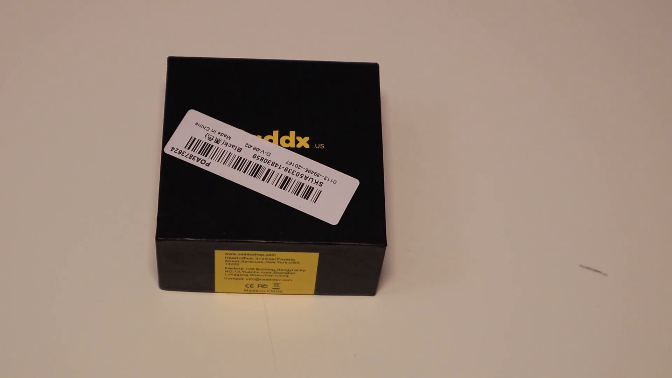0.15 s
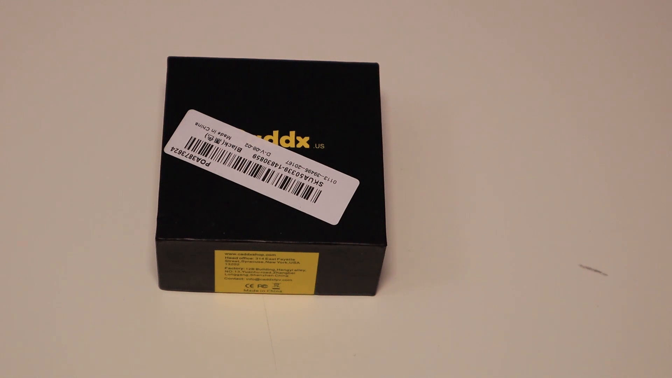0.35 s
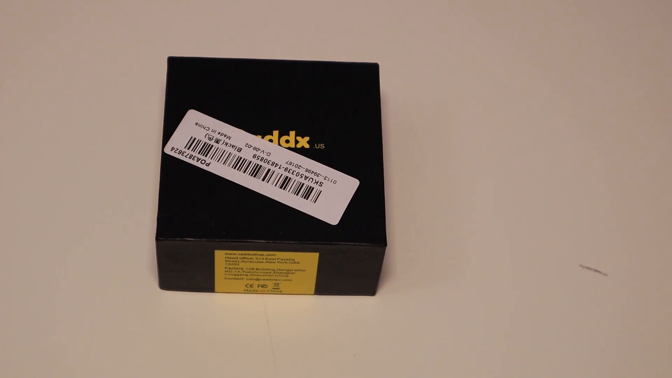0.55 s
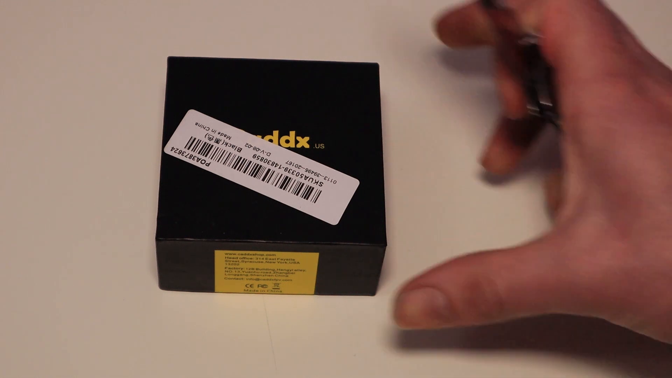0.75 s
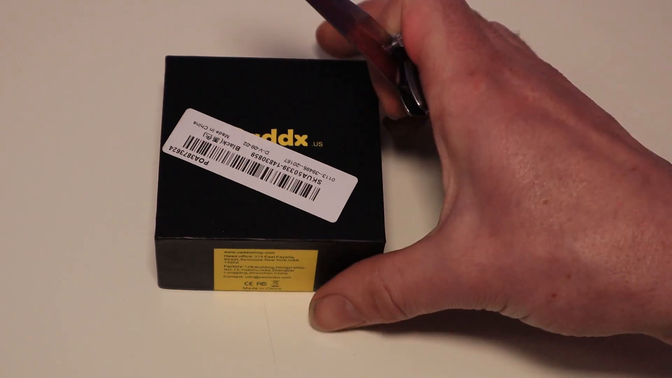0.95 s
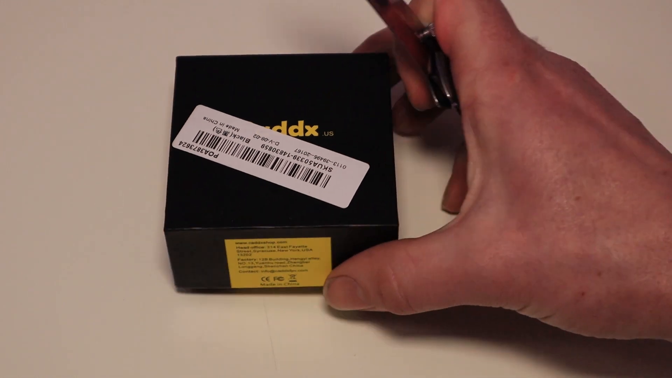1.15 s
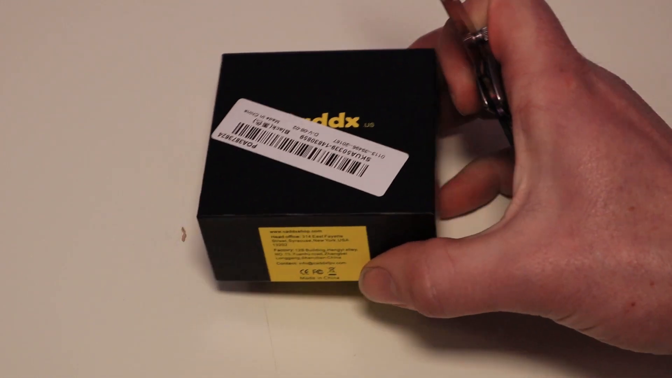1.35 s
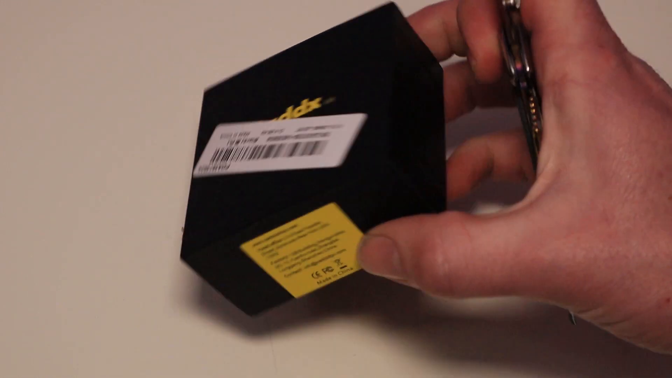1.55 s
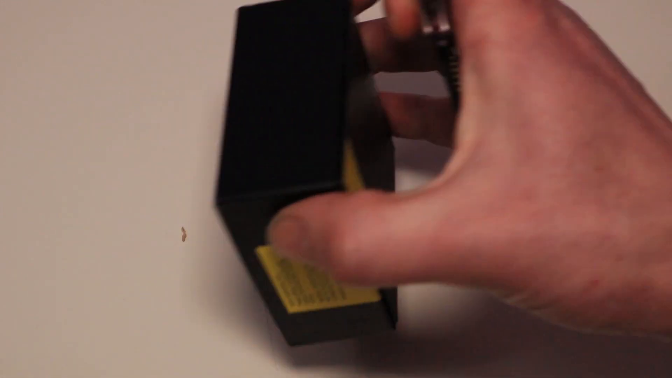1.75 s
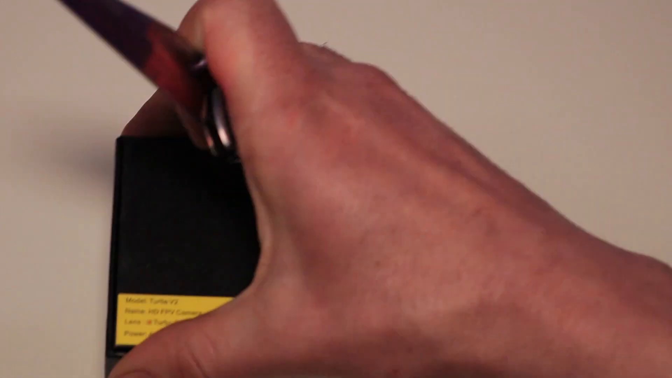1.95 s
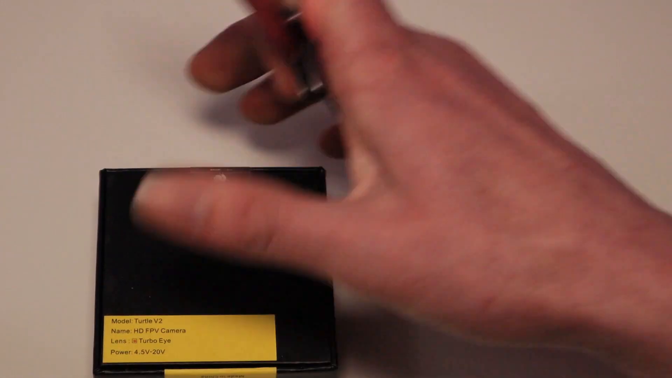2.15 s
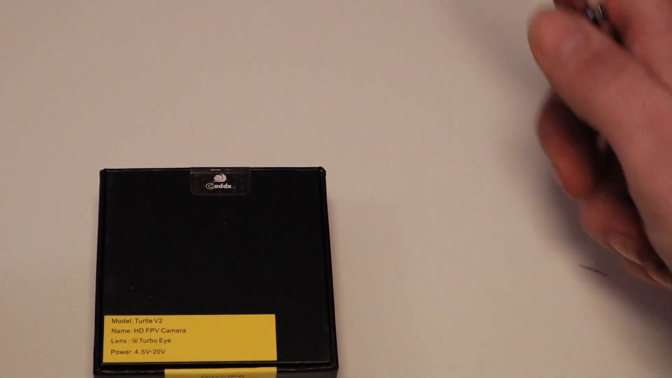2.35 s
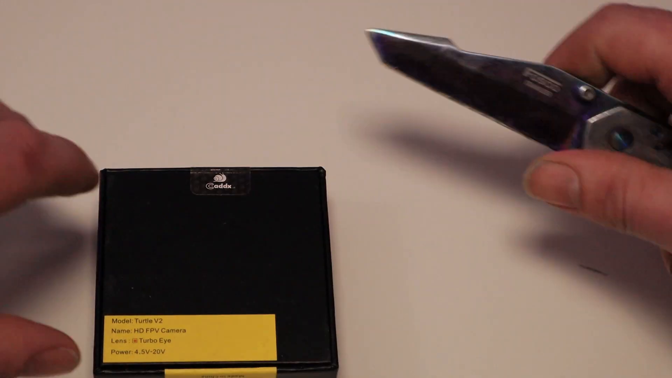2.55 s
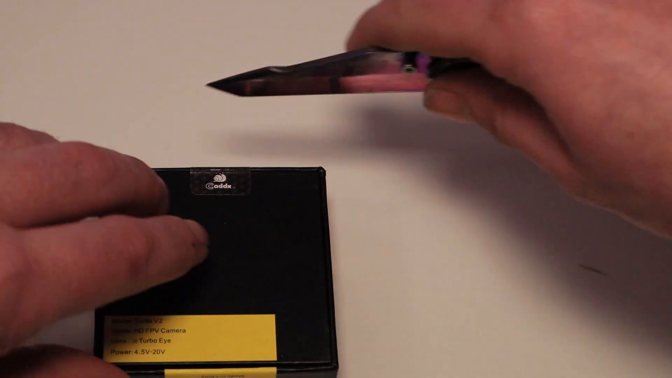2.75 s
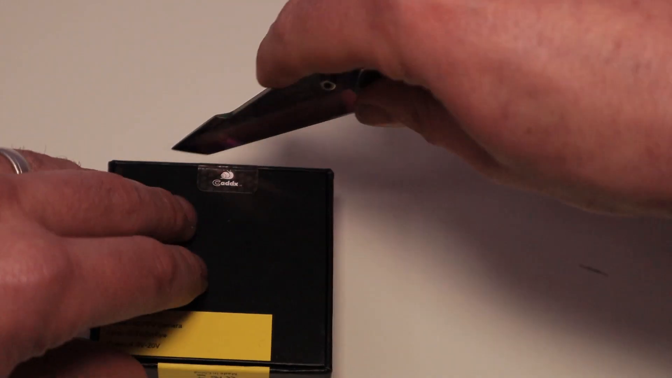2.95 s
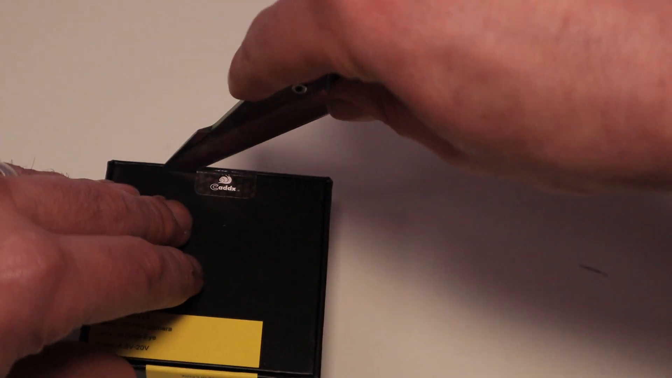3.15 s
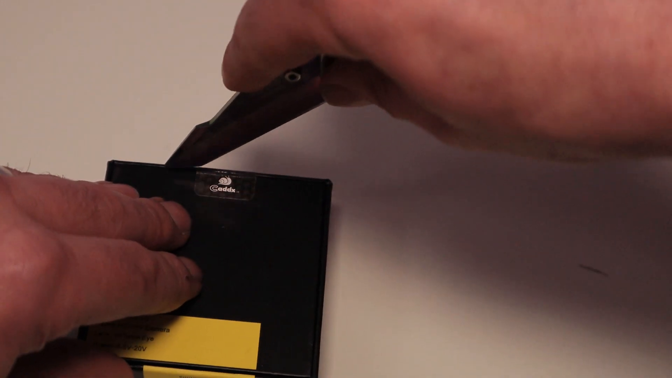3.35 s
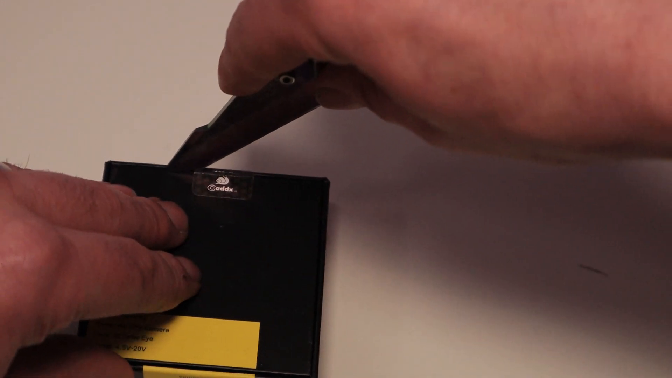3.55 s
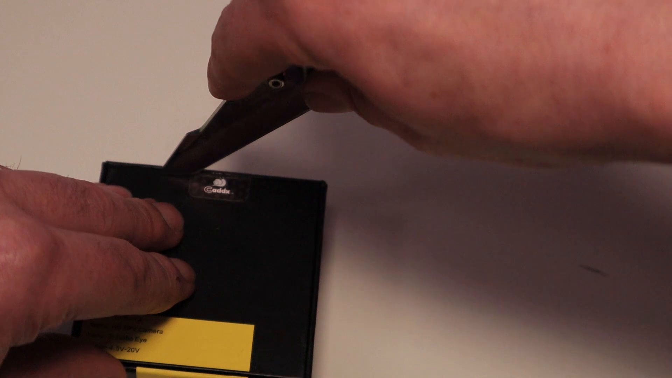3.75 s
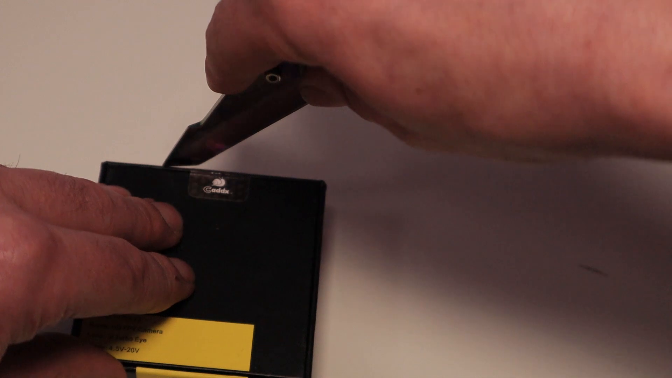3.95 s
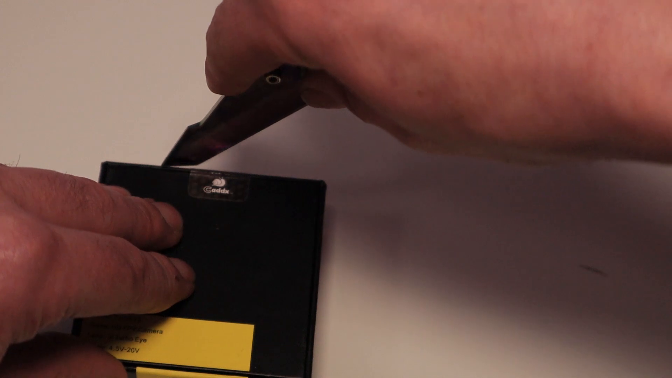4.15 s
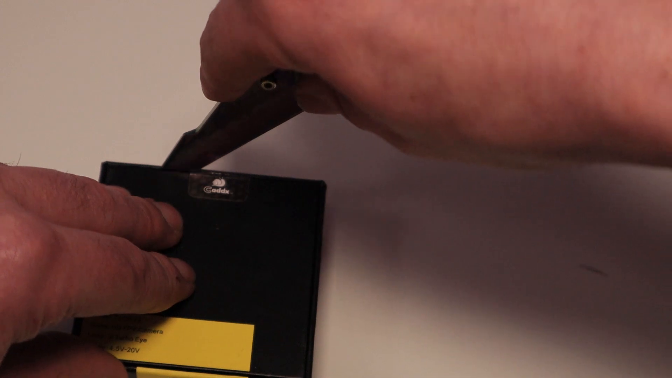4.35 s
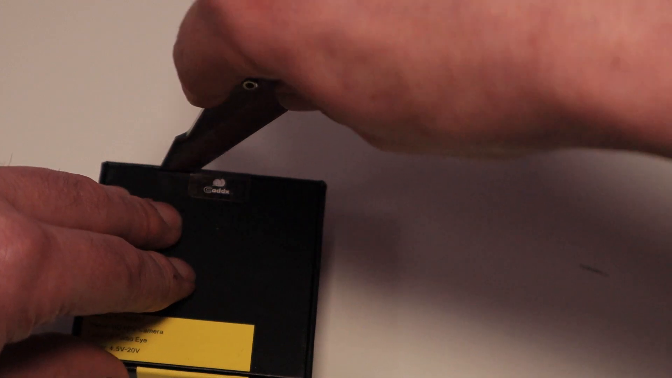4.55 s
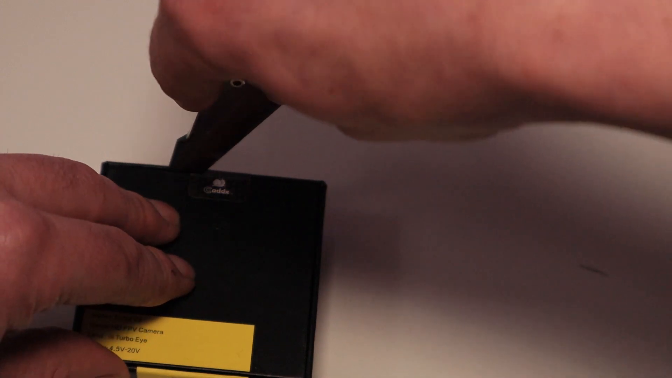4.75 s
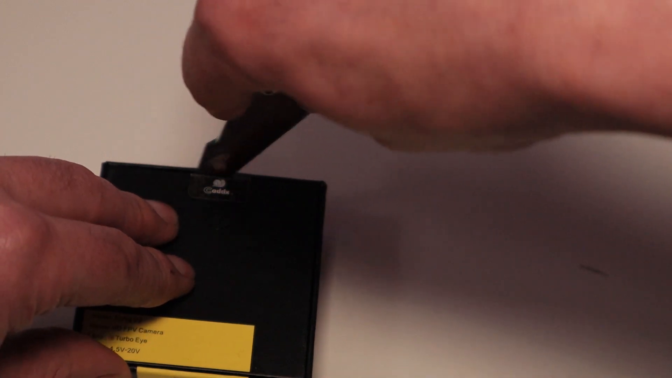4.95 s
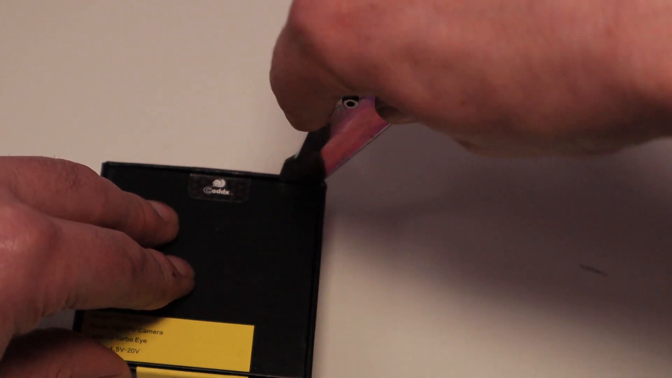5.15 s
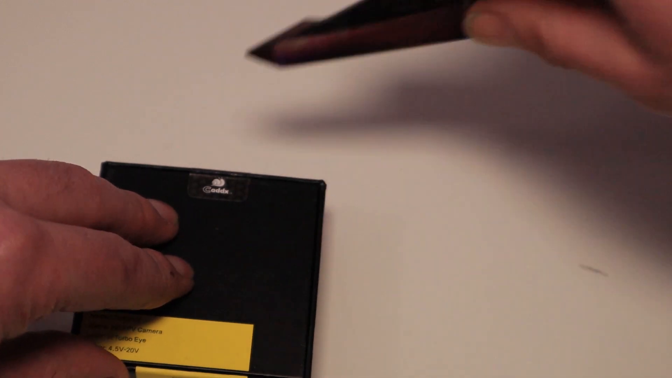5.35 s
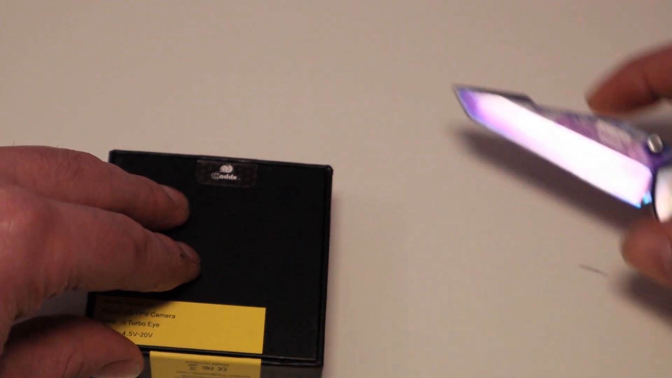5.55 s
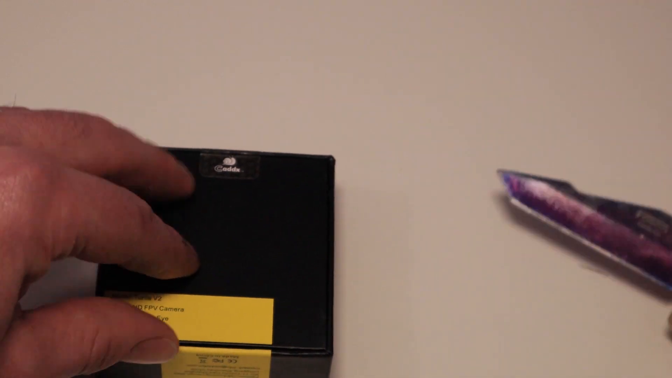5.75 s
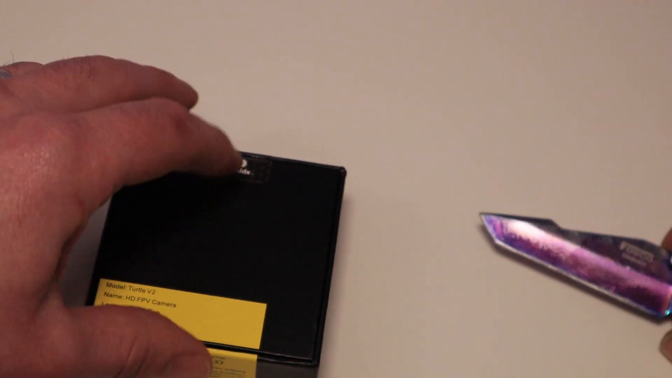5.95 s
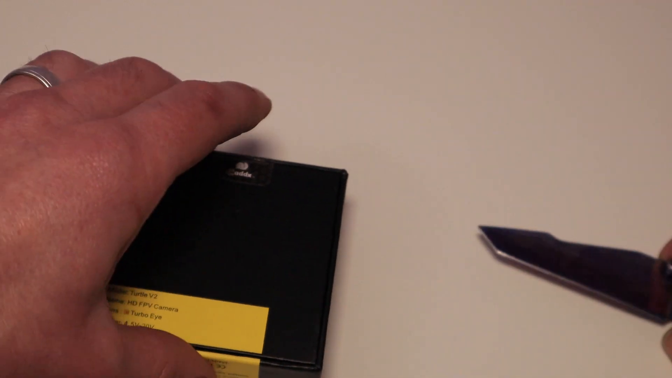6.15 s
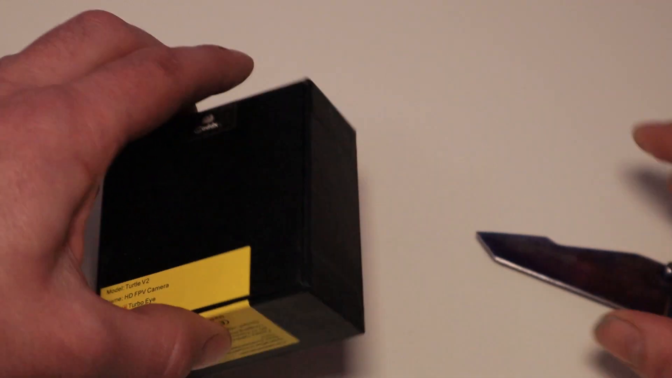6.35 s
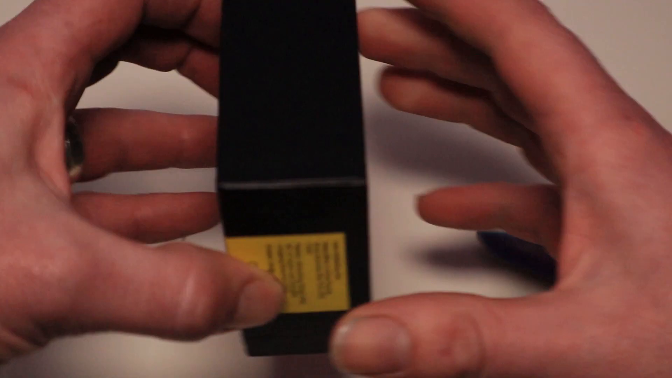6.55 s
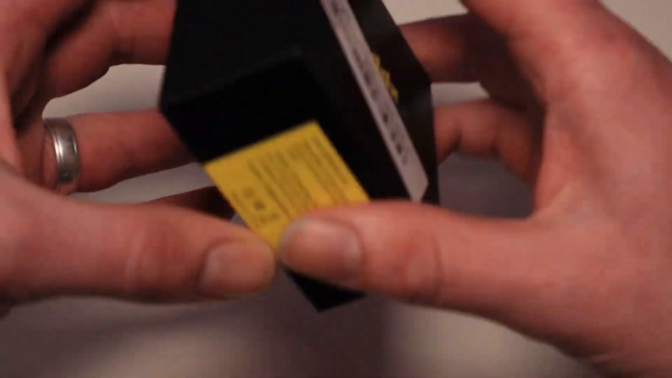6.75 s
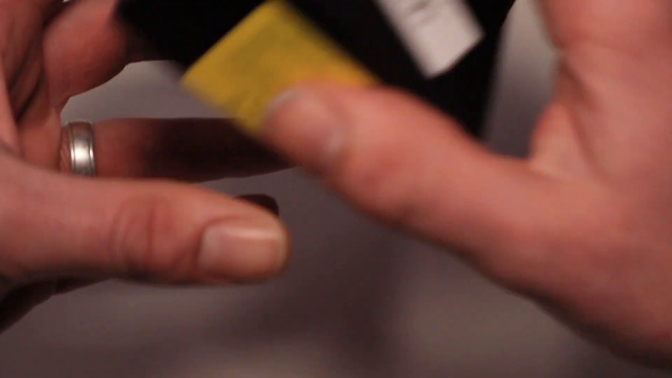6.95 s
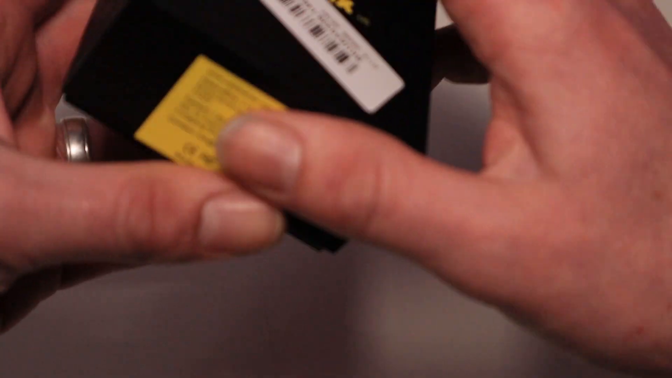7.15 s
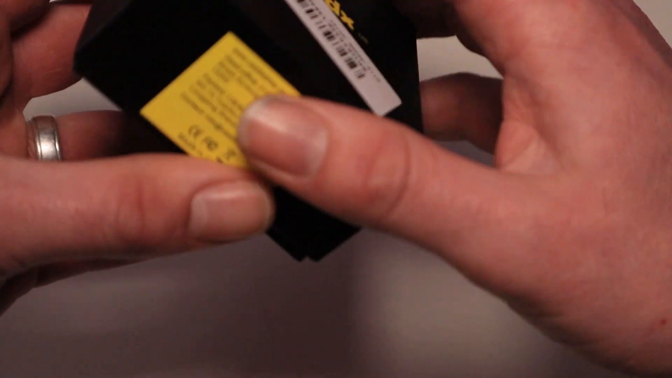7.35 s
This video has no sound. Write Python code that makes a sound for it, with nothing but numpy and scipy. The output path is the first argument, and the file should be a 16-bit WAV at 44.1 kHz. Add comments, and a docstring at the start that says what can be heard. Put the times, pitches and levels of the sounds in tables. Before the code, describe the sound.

In a quiet small room, close to a stereo microphone, a folding knife snaps open with a bright steel clack. A small rigid box is gripped with a hollow knock, scuffed, turned and dropped in a tight cluster of loud clacks. Faint blade ticks and dry scrapes follow, sharper as the seal gives. The box is then tipped with loud clattering knocks and a short skid on the table, ending in brief card rubs.

```python
"""Knife and cardboard box

A folding knife snaps open; a small box is gripped, flipped, dropped on a table, slit, tipped and lifted.
Struck card, table and steel are banks of dying modes plus noise bursts; rubbing and skids are clumped slips.
Gusts, deep bumps, a sliding fuzzy tone, a low hum and still air lie around them as shaped noise and sines.
A small room answers; two close microphone ports pick it all up and a peak limiter tames the loudest knocks."""
import sys
import numpy as np
from scipy import signal
from scipy.fft import rfft, irfft, next_fast_len
from scipy.io import wavfile
from scipy.ndimage import uniform_filter1d, minimum_filter1d

SR = 44100
rng = np.random.default_rng(int(sys.argv[2]) if len(sys.argv) > 2 else 0)


def output_pcm(signal):
    """Save a mono or channel-first signal as 16-bit PCM at the path in sys.argv[1].

    Samples are clipped to [-1, 1] before scaling.
    """
    pcm = np.clip(np.atleast_2d(signal).T, -1, 1) * 32767
    wavfile.write(sys.argv[1], SR, np.round(pcm).astype(np.int16))


N = 326781
RING_T = np.arange(SR // 5) / SR  # time axis of one hit [s]

# Blows on the box: fingertips land, it is gripped, tilted, turned, dropped; the blade pokes and the seal
# gives; it is tipped up, knocks along its edge and is lifted. Thump to table ring are relative to the level.
# (time [s], level before contact softening [dB], thump [dB], thump pitch [Hz], crack [dB], snap [dB],
#  table ring [dB], bearing [+ left])
KNOCKS = [(0.684, -59.5, 8.5, 243, -37, -28.5, -12, 0.68), (0.988, -62.5, 7.5, 259, -18, 1, -22, -0.87),
          (1.025, -20, -7.5, 241, -3, -19.5, -7.5, -0.67), (1.029, -20.5, -47, 270, -9, -42, -11.5, .9),
          (1.067, -35, -18, 290, -18, -45, -31, 0.28), (1.411, -39, -1, 265, -19, -23, -3, .85),
          (1.478, -39.5, -10, 300, -6, -27, -9.5, 0.8), (1.758, -45.5, -13, 250, -10, -29, -21.5, -0.59),
          (1.807, -41.5, 0.5, 330, -3, -42, -11, -1), (1.829, -49.5, 10, 306, -9.5, -32, -13, -0.87),
          (1.884, -50, -0.5, 283, -4, -27, -11, -1.1), (1.915, -50.5, 4.5, 302, -13, -30, -12.5, -0.7),
          (1.945, -49, 4.5, 200, -0.5, -12, -11.5, 0.6), (1.995, -51, 7, 208, -14, -22, -12, 0.7),
          (2.0456, -45, -25, 250, 3, -17, -15.5, -0.3), (2.1699, -18.5, -8, 264, -8, -27, -27.5, 0.43),
          (2.1791, -20.5, -7, 420, -1.5, -15, -20.5, 0.31),
          (2.1827, -15.5, -11.5, 436, 0.5, -21.5, -27, 0.023), (2.189, -20, -5, 313, -10, -53, -24, .3),
          (2.229, -35.5, -3, 298.5, -4, -40, -21.5, -0.12), (3.624, -41.5, 8, 265, -9, -18, -37.5, 0.83),
          (3.758, -41.5, 1, 252, -17.5, -21, -19, 0.57), (4.059, -52.5, 6, 280, -30.5, -30.5, -24, 0.43),
          (4.413, -56.5, 14.5, 269, -17, -27, 4.5, 0.39), (5.129, -39, -3.5, 283.6, -6, -20, -3, .5),
          (5.78, -56, 3, 171, -8, -20, -7.5, 0.31), (6.2443, -18, -10, 204, 0, -17.5, -22.5, -0.69),
          (6.287, -32.5, -14, 210, -4, -44, -13, -0.37), (6.3711, -22, -6, 200, -9.5, -25.5, -15, -0.71),
          (6.381, -28.5, -16, 200, -1, -23, 8, -0.3), (6.394, -40.5, -17, 190, -4, -23, -3, -0.63),
          (6.405, -27, -2, 187, -1, -16, -14, -1.4), (6.456, -33.5, 1, 204, 0, -15, -16, -1.2),
          (6.492, -35.5, 2.5, 201, -0.5, -16, -15, -1), (6.531, -36, 0, 210, -5, -18, -14, -0.24),
          (6.554, -36, -3, 197, -2, -34, -6, -.5), (6.58, -42, -1, 227, -8, -29, -3, -0.46),
          (6.604, -42, -4.5, 228, -12, -25, 4, -0.62), (7.125, -42, 3.5, 257, 0.5, -5, -26, 0.21)]
# Strokes of blade and fingers over the card
# (start [s], swell [s], fade [s], peak box body [dB], peak grit [dB])
STROKES = [(0, 0.0015, 0.17, -63.5, -65), (1.079, 0.035, 0.093, -50, -67), (1.19, 0.029, 0.13, -54, -68),
           (1.269, 0.01, 0.26, -55, -81), (1.409, 0.037, 0.087, -46.5, -70),
           (1.737, 0.017, 0.45, -55.5, -69.5), (2.102, 0.078, .015, -61.5, -66),
           (2.499, 0.066, 0.077, -60.5, -68.5), (3.04, 0.0073, 0.22, -62.5, -73),
           (4.011, 0.0097, 0.073, -59.5, -78.5), (4.064, 0.023, 0.12, -58.5, -93),
           (4.24, 0.056, 0.033, -63, -91.5), (4.409, 0.015, 0.032, -53, -72),
           (4.573, 0.075, 0.17, -56, -71.5), (4.774, 0.038, 0.028, -58.5, -53.5),
           (4.907, 0.034, 0.094, -48.5, -58.5), (4.97, 0.16, 0.15, -46, -58.5),
           (5.123, 0.0085, 0.023, -46, -48.5), (5.35, 0.057, 0.016, -55.5, -56),
           (5.413, 0.01, 0.017, -44, -71), (5.557, 0.084, 0.14, -51.5, -67),
           (5.799, 0.015, 0.092, -54.5, -77.5), (6.039, 0.02, 0.052, -59.5, -62.5),
           (6.19, 0.054, 0.033, -62, -64.5), (6.741, 0.02, 0.082, -59.5, -69),
           (6.838, 0.0053, 0.13, -58.5, -72), (7.068, 0.022, 0.027, -43.5, -56.5),
           (7.111, 0.023, 0.028, -36.5, -50.5), (7.14, 0.0081, 0.025, -38.5, -63),
           (7.23, 0.056, 0.039, -76, -87), (7.369, 0.0107, 0.1, -67, -92)]
# The box judders along the table: deeper when pressed harder, duller when slower
# (start [s], length [s], level before band filter and sag [dB], lowest pitch [Hz], highest pitch [Hz])
SKIDS = [(1.189, 0.079, -39, 377, 1500), (1.265, 0.059, -54, 400, 1200), (1.428, 0.076, -45.5, 332, 2500),
         (6.398, 0.169, -30.5, 162, 2000), (6.563, 0.118, -38, 260, 870)]
# Ticks of blade tip and fingernails: (time [s], treble level [dB], box ring over the treble [dB])
TICKS = [(1.155, -74, 20), (1.216, -76, 11), (1.23, -76.5, 25.5), (1.285, -78, 26), (1.882, -72, 10),
         (2.155, -62.5, -2), (3.0533, -63.5, 12), (3.296, -80, 20), (4.0109, -66, -11.5),
         (4.583, -67.5, -1), (4.8013, -63, -7), (4.823, -67.5, 6), (4.928, -62, 3), (5.1086, -52, 5),
         (5.1285, -48.5, 2), (5.462, -49, -1), (5.859, -67.5, 11.5), (5.898, -61, 7), (5.9319, -73, 19.5),
         (5.953, -67.5, 9.5), (6.002, -75.5, 20), (6.129, -68.5, 14.5), (6.6557, -61.5, 11),
         (6.8558, -60, 4), (7.084, -58, 4)]
# The knife flicks open and locks
# (time [s], level [dB], steel noise t60 [s], handle ring over the level [dB], bearing [+ left])
LATCH = [(0.438, -55.5, 0.047, -8, -2.5), (0.443, -35.5, 0.012, -28.5, -1.5),
         (0.445, -41.5, 0.053, -21.5, -2.5), (0.454, -47, 0.036, -12, -0.5), (0.4648, -35.5, 0.062, -5, -2),
         (0.4683, -40, 0.0084, -4, -2)]
# Gusts as the arm sweeps past the microphone: (start [s], length [s], level before sag [dB])
BUFFETS = [(1.815, 0.29, -43.5), (2.359, 0.31, -39)]
# Deep bumps around the gusts: (start [s], length [s], pitch [Hz], peak [dB])
BUMPS = [(1.821, 0.022, 95, -30.5), (1.84, .055, 105, -31), (1.943, 0.06, 132, -46),
         (2.409, 0.039, 65.3, -44), (2.42, .05, 89.2, -37), (2.51, 0.082, 86.1, -33),
         (2.557, 0.063, 62.3, -39)]
# A fuzzy tone that comes twice: (start [s], length [s], starting pitch [Hz], level [dB])
TONES = [(0, 0.19, 306.7, -57.5), (0.461, 0.21, 370, -65.5)]
# Course of the low hum, which drops near its end: (time [s], pitch before waver [Hz], level [dB])
HUM = [(2.651, 133, -63.5), (3.1, 129, -75), (3.6, 130.4, -62), (4.9, 134.2, -65.5), (5.599, 133, -64),
       (6.1, 112.2, -61.5), (6.3, 113, -50)]

# Modes of the card walls: (pitch before detuning [Hz], relative level [dB], t60 before damping [s])
BOX_MODES = [(288.5, 0, 0.18), (350, -4, 0.07), (437, -1.5, 0.053), (617.7, 3.5, 0.062),
             (718.3, 9.5, 0.054), (789.4, 4, 0.097), (872, 2.5, 0.065), (980, -1.5, 0.038),
             (1160.5, -2.5, 0.096), (1450, -12, 0.037), (1770, -7.5, 0.044)]
# Modes of the table top: (pitch before detuning [Hz], relative level [dB], t60 before damping [s])
TABLE_MODES = [(194.5, -6, 0.2), (484, 6.5, 0.11), (568, -14, 0.06), (790, -16, 0.065), (880, -5.5, 0.089),
               (1090, -12, 0.16)]
# Modes of the knife handle: (pitch before detuning [Hz], relative level [dB], t60 [s])
HANDLE_MODES = [(1350, -9, .02), (1700, -9, .02), (2062, -6, .025), (2234, 1, .03), (2412, 0, .03),
                (3133, -12, .02), (4064, -10, .02), (5480, -11, .02)]
# Modes of the blade: (pitch [Hz], relative level [dB], t60 [s])
BLADE_MODES = [(6460, -14, 0.066), (7000, 1.5, 0.08), (7260, -8, 0.11), (8600, -12, .1),
               (10250, -14.5, .12), (10660, -7, 0.15), (10850, 5, 0.1), (11500, -2.5, 0.068),
               (12200, -4, 0.12)]

# Spectrum of rattling card: (frequency [Hz], relative level [dB per Hz])
CLATTER_SPECTRUM = [(60, -22.5), (130, -4.5), (300, 0.5), (520, 2), (820, 7), (1100, -0.5), (1800, -5.5),
                    (3000, -21.5), (5000, -31.5), (8000, -37.5), (11000, -43.5), (13000, -51.5),
                    (16000, -55.5)]
# Spectrum of clacking steel: (frequency [Hz], relative level [dB per Hz])
STEEL_SPECTRUM = [(600, -72), (1200, -21), (2300, -14.5), (3200, -15.5), (5000, -14), (7000, -8.5),
                  (8000, -11.5), (11000, 0), (12500, -7.5), (15000, -20), (16000, -17)]
# Spectrum of the box body under ticks and strokes: (frequency [Hz], relative level [dB per Hz])
BODY_SPECTRUM = [(80, -24.5), (200, -5), (310, -6), (450, -2.5), (590, -4), (730, 2.5), (900, -4),
                 (1100, -9), (1750, -13), (2700, -17), (6000, -38)]
# Spectrum of the direct scrape: (frequency [Hz], relative level [dB per Hz])
GRIT_SPECTRUM = [(800, 0.5), (1900, 8.5), (2800, 9.5), (3700, 4), (5000, 2), (8000, 0.5), (11000, 3),
                 (12500, 1.5), (14000, -16), (16000, -21.5)]
# Spectrum of the gusts: (frequency [Hz], relative level [dB per Hz])
BUFFET_SPECTRUM = [(12, -52), (20, -6), (76, -3.5), (114, 1), (144, -16), (198, -4.5), (440, -18.5),
                   (585, -18.5), (900, -28), (1170, -33), (1980, -120)]
# Spectrum of room air shared by both ports: (frequency [Hz], relative level [dB per Hz])
AIR_SPECTRUM = [(12, -33), (20, -3), (65, 6), (113, -2), (177, -10), (319, -8.5), (399, -11.5),
                (718, -15.5), (1060, -18.5), (3440, -26), (8650, -36), (11400, -34.5), (13200, -48),
                (16000, -68)]
# Spectrum of room air that differs between the ports: (frequency [Hz], relative level [dB per Hz])
AIR_SIDE_SPECTRUM = [(20, -45), (60, -27), (187, 1), (700, -0.5), (2700, -8), (11800, -22.5),
                     (13200, -22.5), (14300, -52.5), (16000, -50)]
# Room decay: (frequency [Hz], t60 [s])
ROOM_DECAY = [(200, 0.11), (300, 0.52), (870, 0.43), (2300, 0.46), (6000, 0.44), (12000, 0.31),
              (15000, 0.17)]
# Gain from the sideways row to the port difference: (frequency [Hz], gain [dB])
PORT_WIDTH = [(50, -38), (110, -37.5), (200, -22.5), (380, -10), (700, -8.5), (1290, -0.5), (2380, 1),
              (4400, 3), (8120, 3), (15000, 3.5)]

THUMP_CYCLES = 5.2  # the air in the box: cycles until a thump has fallen 60 dB
CONTACT_S = 0.00091  # contact time constant of a blow whose thump equals its level
CLATTER_T60_S, CLATTER_S_PER_DB = 0.028, 0.0559  # blows with more crack clatter for longer
CLATTER_DB = -1.5  # clatter over the ring of the walls
STROKE_CURVE = 1.1  # loudness follows stroke speed to this power
HOLLOW_HZ, HOLLOW_DB = 755, -1  # where the hollow box sings, and its level over the body
GRAIN_LOW_HZ, GRAIN_HIGH_HZ = 1000, 3803  # pitch range of snapping fibres
GRAINS_PER_S, GRAIN_DB = 460, -4  # snap rate, and level over the grit
SKID_ATTACK_S, SKID_RELEASE_S, SKID_SAG_DB_PER_S = 0.016, 0.062, 29
BUFFET_ATTACK_S, BUFFET_RELEASE_S, BUFFET_SAG_DB_PER_S = 0.03, 0.13, 11.5
BUFFET_LUMPS_DB = 1.3  # unevenness within a gust
TONE_SLIDE_HZ_PER_S, TONE_ATTACK_S, TONE_RELEASE_S = 120, 0.016, 0.094
HUM_FADE_S = 0.047
AIR_DB = -61  # shared room air
EDGE_HZ = 15900  # final band limit


def knocks():
    """Card walls ring and clatter; soft blows thump, hard edges crack, and the table top rings along."""
    out = np.zeros((2, N))
    click = unit_hit(colour(signal.unit_impulse(len(RING_T)), CLATTER_SPECTRUM))
    for s, db, thump_db, thump_hz, crack_db, snap_db, table_db, bearing in KNOCKS:
        # clean contact, then the card rattles
        rattle = burst(CLATTER_T60_S + CLATTER_S_PER_DB * crack_db, CLATTER_SPECTRUM)
        clatter = unit_hit(click + rattle)
        walls = ring(BOX_MODES, damping=0.95, detune=.05) + amp(CLATTER_DB) * clatter
        walls = band(band(walls, 380, "highpass", order=2), 1000, "lowpass")
        crack = band(clatter, [1100, 4600], "bandpass", order=2)
        snap = band(clatter, [4400, 12500], "bandpass")
        thump = band(ping(thump_hz, THUMP_CYCLES), [100, 600], "bandpass", order=3)
        hit = unit_hit(walls) + amp(crack_db) * unit_hit(crack)
        hit += amp(snap_db) * unit_hit(snap) + amp(thump_db) * unit_hit(thump)
        hit += amp(table_db) * ring(TABLE_MODES, detune=0.0059)
        # thumping blows have a longer, softer contact
        press = 1 - np.exp(-RING_T / (CONTACT_S * amp(thump_db)))
        add(out, s, amp(db) * press * hit, bearing)
    return band(out + 1e-12, 120, "highpass")  # too small a box to radiate deep bass


def rubbing():
    """Each stroke speeds up and slows down; the same slips hiss directly and drone in the hollow box."""
    body_gain, grit_gain = np.zeros((2, N))
    for s, swell_s, fade_s, body_db, grit_db in STROKES:
        first = max(round(s * SR), 0)
        at = np.arange(first, min(round((s + swell_s + fade_s) * SR), N))
        speed = np.interp(at / SR - s, [0, swell_s, swell_s + fade_s], [0, 1, 0])
        body_gain[at] += amp(body_db) * speed ** STROKE_CURVE
        grit_gain[at] += amp(grit_db) * speed ** STROKE_CURVE
    drive = slips(per_s=2000, spread_db=3.2, clump_db=1.8, smooth=.45)
    body = evened(evened(colour(drive, BODY_SPECTRUM)) + amp(HOLLOW_DB) * hollow(drive))
    grit = evened(evened(colour(drive, GRIT_SPECTRUM)) + amp(GRAIN_DB) * grains())
    return np.outer([1, 1.05], body * body_gain) + np.outer([1, 1.1], grit * grit_gain)


def slips(per_s, spread_db, clump_db, smooth):
    """Fibres catch and let go: clumped clicks of uneven size over a smooth hiss."""
    sizes = amp(spread_db * np.minimum(rng.exponential(1, N), 4))
    clicks = rng.standard_normal(N) * (rng.random(N) < per_s / SR) * sizes
    clumps = amp(clump_db * evened(band(rng.standard_normal(N), 79, "lowpass")))
    return evened(clumps * (evened(clicks) + smooth * rng.standard_normal(N)))


def hollow(drive):
    """A broad resonance whose pitch wanders as the hand presses on the box."""
    hz = HOLLOW_HZ * (1 + 0.05 * evened(band(rng.standard_normal(N), 12, "lowpass")))
    turn = np.exp(2j * np.pi * np.cumsum(hz) / SR)
    # shift the resonance down to 0 Hz, keep what is near it, shift it back
    return evened((turn * band(drive / turn, 175, "lowpass")).real)


def grains(count=14):
    """Single fibres snap, each on one of a set of pitches."""
    snaps = rng.standard_normal((count, N)) * (rng.random((count, N)) < GRAINS_PER_S / count / SR)
    pitches = np.geomspace(GRAIN_LOW_HZ, GRAIN_HIGH_HZ, count)
    return evened(sum(signal.oaconvolve(row, ping(hz, 5))[:N] for row, hz in zip(snaps, pitches)))


def skidding():
    """The bottom edge sticks and slips, shaking the table top and rattling the card."""
    grip = slips(per_s=470, spread_db=2.5, clump_db=3.0, smooth=0.22)
    drive = np.zeros(N)
    for s, length, db, low_hz, top_hz in SKIDS:
        gain = amp(db) * swell(s, length, SKID_ATTACK_S, SKID_RELEASE_S, SKID_SAG_DB_PER_S)
        drive += band(grip * gain + 1e-12, [low_hz, top_hz], "bandpass", order=3)
    answer = ring(TABLE_MODES, damping=1.24) + amp(-5.0) * burst(0.0051, CLATTER_SPECTRUM)
    return np.outer([1, -.6], signal.oaconvolve(drive, answer / np.linalg.norm(answer))[:N])


def ticks():
    """A sharp point catches on the card, which answers with a short ring."""
    out = np.zeros((2, N))
    for s, db, ring_db in TICKS:
        tick = burst(.02, GRIT_SPECTRUM) + amp(ring_db) * burst(.03, BODY_SPECTRUM)
        add(out, s, amp(db) * tick, 1.1)
    return out


def knife():
    """The blade leaves its catch and slams into the lock; blade and handle ring."""
    out = np.zeros((2, N))
    for s, db, t60, handle_db, bearing in LATCH:
        clack = burst(t60, STEEL_SPECTRUM) + amp(-10.5) * ring(BLADE_MODES)
        clack += amp(handle_db) * ring(HANDLE_MODES, detune=0.068)
        add(out, s, amp(db) * band(clack, 870, "highpass"), bearing)
    return out


def near_echo(x, early_db, early_t60):
    """Table, hands and camera answer at once: dense echoes that die fast."""
    decay = amp(-60 * RING_T / early_t60) * (RING_T > .001)
    return echoed(x, reflections()[:, :len(RING_T)] * decay, early_db)


def room(sides, wet_db):
    """Each side of the box sends its own sound to the walls; the tails blend and die band by band."""
    out = np.zeros((2, N))
    for x in sides:
        hz, t, z = signal.stft(reflections(), SR, nperseg=256)
        decay = amp(-60 * t / read(ROOM_DECAY, hz)[:, None])
        tail = signal.istft(z * decay, SR, nperseg=256)[1][:, :SR]
        build_up = np.clip(np.arange(SR) / SR / 0.017, 0, 1) ** 2
        tail = band(tail, 210, "highpass", order=3) * build_up
        out += echoed(x, tail, wet_db)
    return out / np.sqrt(len(sides))


def reflections():
    """Sparse echoes of random size over one second."""
    return rng.standard_normal((2, SR)) * (rng.random((2, SR)) < 4000 / SR)


def echoed(x, response, db):
    """Plays a sound through a response of the given level."""
    response = amp(db) * response / np.linalg.norm(response, axis=1, keepdims=True)
    return signal.oaconvolve(x[None], response, axes=1)[:, :N]


def buffeting():
    """Lumpy low rumble of moving air right at the microphone."""
    gusts = np.zeros(N)
    for s, length, db in BUFFETS:
        gusts += amp(db) * swell(s, length, BUFFET_ATTACK_S, BUFFET_RELEASE_S, BUFFET_SAG_DB_PER_S)
    lumps = amp(BUFFET_LUMPS_DB * evened(band(rng.standard_normal(N), 30, "lowpass")))
    rumble = evened(lumps * colour(rng.standard_normal(N), BUFFET_SPECTRUM))
    return np.outer([1, .3], gusts * rumble)


def bumps():
    """Soft, deep pushes of air, a few cycles long."""
    t = np.arange(N) / SR
    out = np.zeros(N)
    for s, length, hz, db in BUMPS:
        push = np.sin(2 * np.pi * (hz * t + rng.random()))
        out += amp(db) * swell(s, length, length / 2, length / 2) * push
    return np.outer([1, 0], out)


def drifting_tone():
    """A narrow band of noise that slides down in pitch."""
    fuzz = band(rng.standard_normal(N) + 1j * rng.standard_normal(N), 74, "lowpass")
    out = np.zeros(N)
    for s, length, hz, db in TONES:
        slide = TONE_SLIDE_HZ_PER_S * np.clip(np.arange(N) / SR - s, 0, length)
        turns = np.cumsum(hz - slide) / SR
        tone = evened((fuzz * np.exp(2j * np.pi * turns)).real)
        out += amp(db) * swell(s, length, TONE_ATTACK_S, TONE_RELEASE_S) * tone
    return np.outer([1, .3], out)


def hum():
    """A faint low sine whose pitch wavers at random."""
    s, hz, db = np.transpose(HUM)
    t = np.arange(N) / SR
    waver = 1 + 0.012 * evened(band(rng.standard_normal(N), 8.5, "lowpass"))
    turns = np.cumsum(np.interp(t, s, hz) * waver) / SR
    fade = swell(s[0] - HUM_FADE_S, s[-1] - s[0] + 2 * HUM_FADE_S, HUM_FADE_S, HUM_FADE_S)
    return np.outer([1, 0], amp(np.interp(t, s, db)) * fade * evened(np.sin(2 * np.pi * turns)))


def background(side_db):
    """Still room air: deep bass is shared by both ports, the part that differs lies higher."""
    shared = amp(AIR_DB) * evened(colour(rng.standard_normal(N), AIR_SPECTRUM))
    apart = amp(side_db) * evened(colour(rng.standard_normal(N), AIR_SIDE_SPECTRUM))
    return np.array([shared + apart, shared - apart])


def amp(db):
    """Decibels to gain."""
    return 10 ** (np.asarray(db) / 20)


def evened(x):
    """Scales to rms 1."""
    return x / np.sqrt(np.mean(x ** 2) + 1e-20)


def unit_hit(x):
    """Scales a hit to the energy of 15 ms at rms 1."""
    return x / np.sqrt(np.sum(x ** 2) / (.015 * SR) + 1e-20)


def read(points, hz):
    """Reads a spectrum on a log-frequency axis."""
    f, value = np.transpose(points)
    return np.interp(np.log(hz + 1), np.log(f + 1), value)


def colour(x, spectrum):
    """Causal (minimum-phase) filter with the given spectrum, so attacks stay sharp."""
    n = 2 * next_fast_len(len(x))
    log_gain = np.log(amp(read(spectrum, abs(np.fft.fftfreq(n, 1 / SR)))))
    response = np.exp(np.conj(signal.hilbert(log_gain)))[:n // 2 + 1]
    return irfft(rfft(x, n) * response, n)[:len(x)]


def band(x, hz, kind, order=4):
    """Causal band filter."""
    return signal.sosfilt(signal.butter(order, hz, kind, fs=SR, output="sos"), x)


def ring(modes, damping=1, detune=0):
    """Dying modes; each strike meets them with other signs and may shift their pitch."""
    out = np.zeros(len(RING_T))
    for hz, db, t60 in modes:
        decay = rng.choice([-1, 1]) * amp(db - 60 * damping * RING_T / t60)
        pitch = hz * (1 + detune * rng.uniform(-1, 1))
        out += decay * np.sin(2 * np.pi * pitch * RING_T)
    return unit_hit(out)


def burst(t60, spectrum):
    """Crowded modes too close to tell apart: dying noise, with a t60 of at least 2 ms."""
    noise = rng.standard_normal(len(RING_T)) * amp(-60 * RING_T / max(t60, .002))
    return unit_hit(colour(noise, spectrum))


def ping(hz, cycles):
    """One pitch that falls 60 dB within the given number of cycles."""
    return unit_hit(np.sin(2 * np.pi * hz * RING_T) * amp(-60 * hz * RING_T / cycles))


def swell(start, length, attack, release, sag_db_per_s=0):
    """Gain over time: attack, a hold that may sag, release."""
    t = np.clip(np.arange(N) / SR - start, 0, length)
    return np.clip(np.minimum(t / attack, (length - t) / release), 0, 1) * amp(-sag_db_per_s * t)


def add(mix, s, sound, bearing):
    """Adds a sound to the pressure row and, by its bearing, to the sideways row."""
    part = mix[:, round(s * SR):][:, :len(sound)]
    part += np.outer([1, bearing], sound[:part.shape[1]])


def scene():
    """Sums pressure and sideways rows; the ports turn the sideways one into a phase difference."""
    handling = ticks() + knife() + rubbing() + skidding()
    front, left, right = knocks(), knocks(), knocks()  # each side of the box rings a little differently
    direct = front + handling
    echo = near_echo(direct[0], early_db=-2.0, early_t60=0.032)
    echo += room([face[0] + handling[0] for face in (front, left, right)], wet_db=-8.5)
    mid, sideways = direct + echo + buffeting() + bumps() + drifting_tone() + hum()
    # a quarter-turn of phase, mostly stronger with pitch
    side = irfft(1j * rfft(sideways) * amp(read(PORT_WIDTH, np.fft.rfftfreq(N, 1 / SR))), N)
    ports = np.array([mid + side, mid - side]) + background(side_db=-64)
    return ports * amp([[-.3], [.3]])  # the right port is slightly louder


def record(dry):
    """A peak limiter ducks the loudest knocks, holds a moment and recovers quickly; then the band limit."""
    over_db = np.maximum(20 * np.log10(abs(dry).max(0) + 1e-9) + 4.6, 0)  # above -4.6 dB full scale
    held_db = -minimum_filter1d(-over_db, size=1201, origin=570)  # hold about 27 ms, in samples
    recovery = np.arange(N) / SR * 200  # dB a second
    duck_db = uniform_filter1d(np.maximum.accumulate(held_db + recovery) - recovery, size=41)
    lowpass = signal.firwin(301, EDGE_HZ, window=("kaiser", 9), fs=SR)
    return signal.oaconvolve(dry * amp(-duck_db), lowpass[None], "same")


dry = scene()
out = record(dry)
output_pcm(out)
```